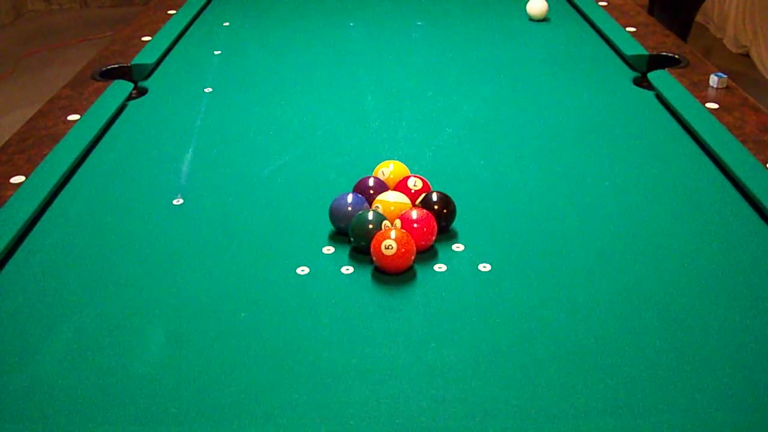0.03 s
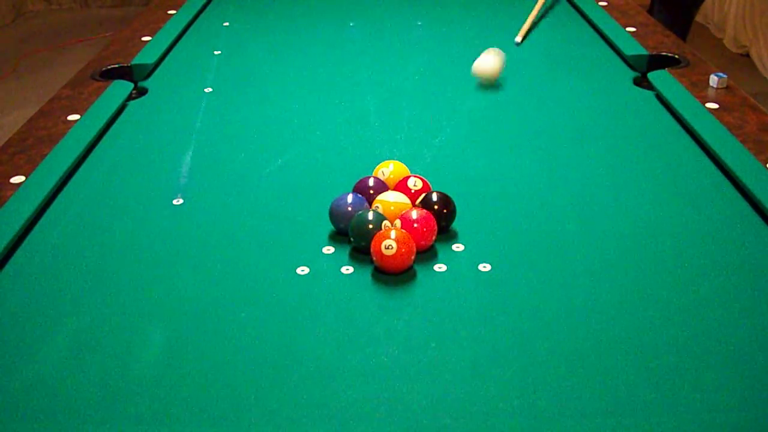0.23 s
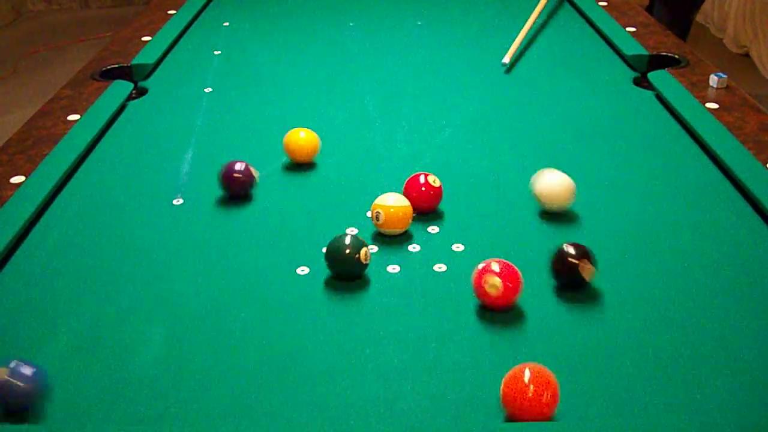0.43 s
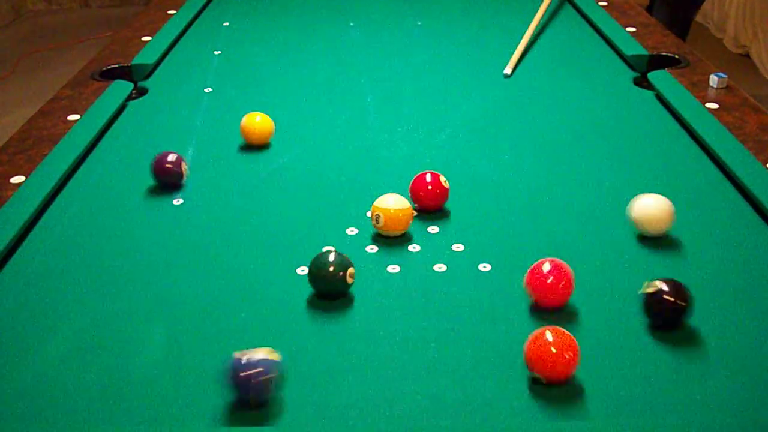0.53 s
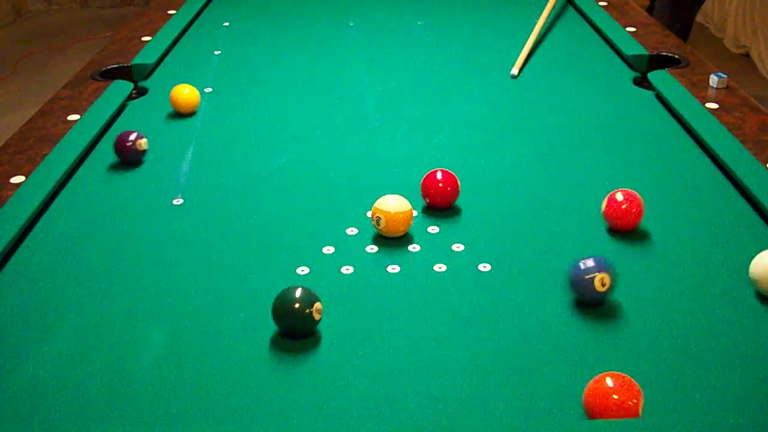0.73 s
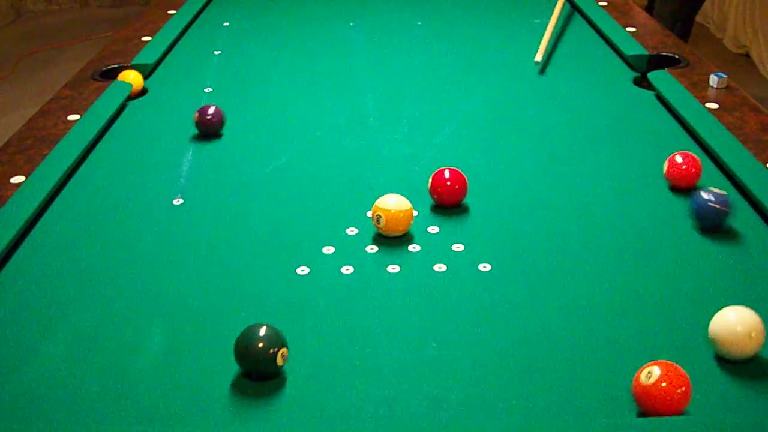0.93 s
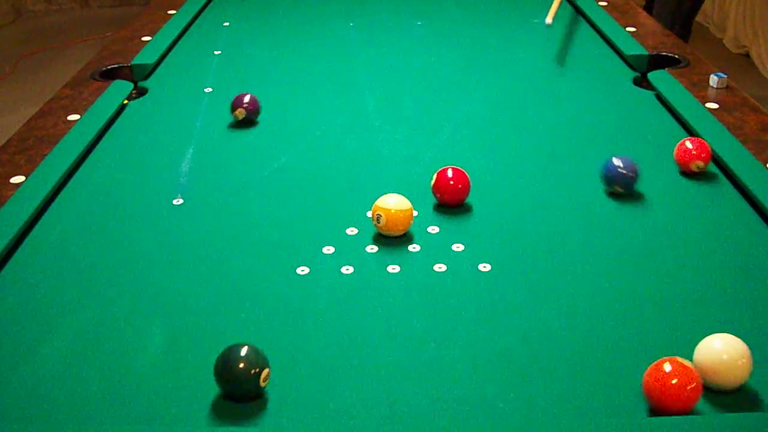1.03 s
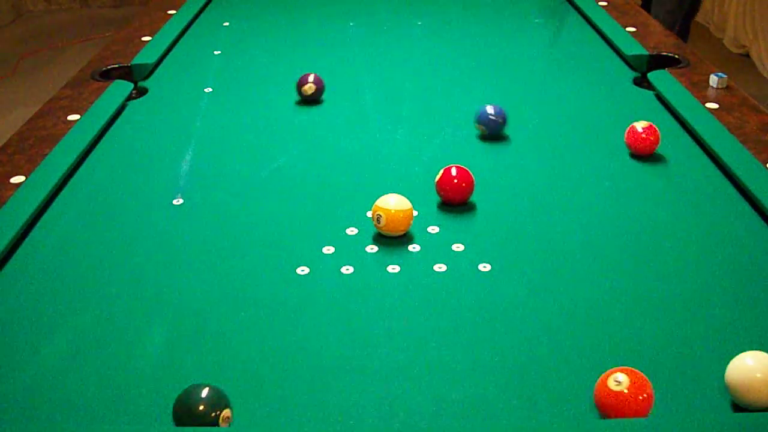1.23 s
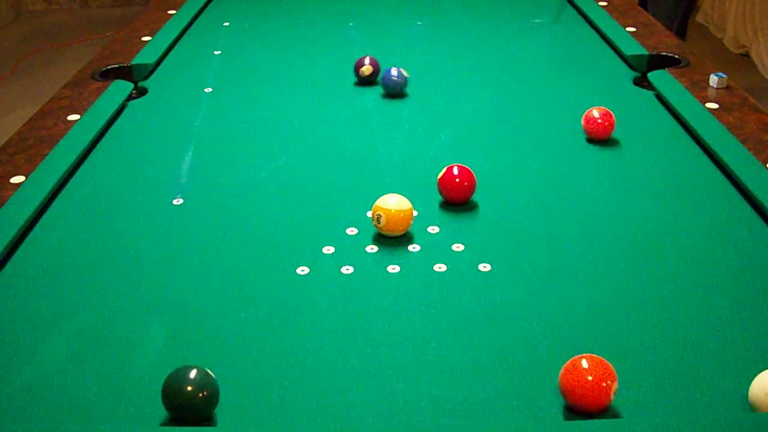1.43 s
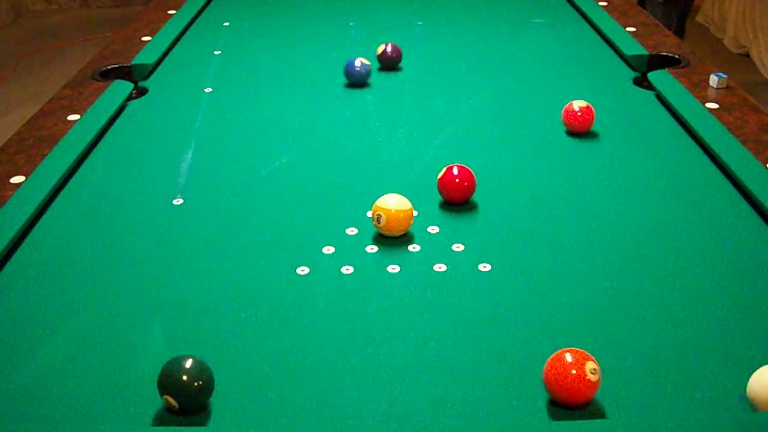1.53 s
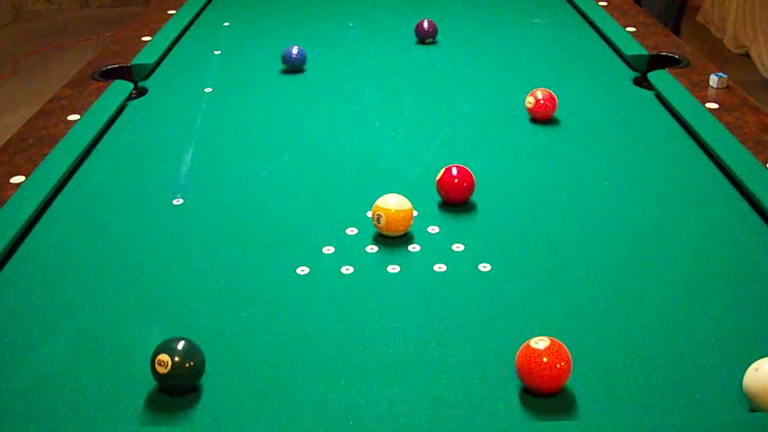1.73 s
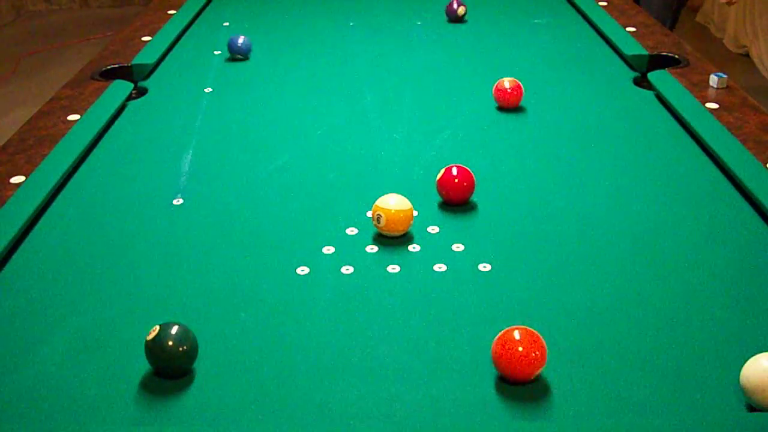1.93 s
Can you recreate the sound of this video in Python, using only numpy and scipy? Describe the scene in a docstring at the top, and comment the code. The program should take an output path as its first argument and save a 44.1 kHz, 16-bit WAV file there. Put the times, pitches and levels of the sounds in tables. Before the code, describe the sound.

A pool break, heard close in a reverberant room. A cue tocks with a faint ring at 0.25 seconds, then the ball cracks into the rack at 0.4, briefly overloading the microphone. Dull cushion thuds follow over soft rolling, with single clacks near 0.6, 1.1 and 1.5 seconds. At 0.9 a ball drops into a pocket, knocking and rumbling down the wooden return, fading toward 2 seconds.

```python
"""A cue tocks and rings, then the cue ball cracks into the rack: a pool break in a live room. Heard from just
above the foot of the table, hard balls clack, roll on cloth and thud on rubber cushions. One drops into a
pocket and rattles down the wooden ball return, ringing its hollow wood. The loudest hits duck the gain and
overload the microphone."""
import sys
import numpy as np
from scipy import signal
from scipy.fft import rfft, irfft
from scipy.io import wavfile

SR = 44100
rng = np.random.default_rng(int(sys.argv[2]) if len(sys.argv) > 2 else 0)


def master_out(mix):
    """Clip the mix to full scale and print it as 16-bit PCM to the path in sys.argv[1]."""
    frames = np.transpose(np.atleast_2d(mix))
    ceiling = np.clip(frames, -1, 1)
    pcm = np.round(ceiling * 32767).astype(np.int16)
    wavfile.write(sys.argv[1], SR, pcm)


N = 88200

# modes of the hollow wooden ball return: (frequency [Hz], level [dB], t60 [s])
WOOD_MODES = [(102.6, -3, .35), (172.4, 0.5, 0.41), (233.5, -2.5, .38), (293.5, -2, 0.24), (334, -5.5, .2),
              (382.6, -8.5, 0.19), (509.8, -1, 0.2), (563, -4.5, 0.16), (817, -13, 0.18)]


def ball_clacks():
    """Ball on ball: a few pressure swings, pitched by the contact time, with a sharp edge."""
    # collisions: (time [s], level [dB], pitch [ratio], room send [dB])
    collisions = [(0.366, 6.5, 0.587, -1.5), (0.3665, 12.5, 1.014, -1.5), (0.3669, 8, 1.394, -2.5),
                  (0.3768, -1, 1.44, 3), (0.385, 4, 1.05, 1), (0.3935, -5, 1.2, 6.5),
                  (.3958, -2.5, 0.89, 3.5), (0.5672, 7.5, 1.09, -16.5), (1.0175, -16, 0.88, 8.5),
                  (1.0872, -4, 0.92, -3), (1.5414, 2, 0.95, -11.5)]
    # edge spectrum at pitch 1: (frequency [Hz], level [dB])
    edge_spectrum = [(80, -13), (300, -4), (600, -1.5), (1200, -6.5), (2000, 5.5), (2900, -8), (3600, -12),
                     (4500, -12), (5600, -18.5), (8000, -19)]
    base_hz, edge_db, edge_lag_s = 2230, -9, 0.00045
    out = np.zeros(N)
    for start_s, db, pitch, room_db in collisions:
        contact = swing(base_hz * pitch, cycles=0.93)
        edge = amp(edge_db) * at(edge_lag_s, impulse(edge_spectrum, pitch))
        out += at(start_s, in_room(amp(db) * (contact + edge), room_db))
    return out


def bed_jolt():
    """The bursting rack thumps the table bed, heard mostly through the room."""
    start_s = 0.3675
    return at(start_s, in_room(amp(-6) * thump(hz=534, cycles=0.48), room_db=5.5))


def cue_strike():
    """The tip tocks on the cue ball with a low shove; the shaft cracks and rings."""
    # shaft crack at pitch 1: (frequency [Hz], level [dB])
    crack_spectrum = [(60, 0.5), (250, 7.5), (550, 14), (850, 17), (1200, 2.5), (1650, 12.5), (2000, 3.5),
                      (3600, 3), (5200, 1), (7000, 4.5), (8500, -2.5)]
    # shaft modes: (frequency [Hz], level [dB], t60 [s])
    shaft_modes = [(2899, 1, 0.42), (2966, -6, 0.57), (4410, -1.5, 0.15), (4497, -2, 0.25),
                   (4542, -1, 0.17), (5740, -6.5, 0.16), (6840, -12, 0.31)]
    start_s, shove_lag_s, shaft_lag_s = 0.2427, 0.0013, 0.0012
    tock = amp(1.5) * swing(hz=815, cycles=1.13)
    shove = at(shove_lag_s, amp(-4.5) * thump(hz=297, cycles=0.21))
    crack = amp(-14) * impulse(crack_spectrum, pitch=0.92)
    ringing = amp(-26.5) * ring(shaft_modes)
    tip = in_room(tock + shove, room_db=-15)
    shaft = in_room(crack, room_db=25.5) + in_room(ringing, room_db=3.5)
    return at(start_s, tip) + at(start_s + shaft_lag_s, shaft)


def pocket_knocks():
    """The potted ball bumps down the return: each contact thumps, ticks and rings the wood."""
    # contacts: (time [s], thump [dB], thump pitch [Hz], thump rise [cycles], tick [dB], room send [dB])
    contacts = [(0.9026, -21.5, 796, 0.91, -22, -4), (.9178, -15, 510, 0.31, -22.5, 1.5),
                (0.9377, -1, 361, 0.48, -15.5, -9), (1.0176, -12, 882, 0.85, -28.5, 2.5),
                (1.0612, -12, 456, 0.81, -23, -0.5), (1.0797, -6.5, 575, 0.49, -18, -11),
                (1.083, -22, 449, 0.72, -18, -5.5), (1.1395, -22, 390, .4, -34.5, -9),
                (1.186, -21.5, 497, 0.74, -32.5, 2), (1.2742, -9, 694, 0.65, -22.5, 2),
                (1.2779, -8, 573, 1.3, -18.5, -9.5), (1.3075, -5.5, 962, 0.82, -36.5, -3.5),
                (1.3520, -14, 800, 0.4, -29, -2), (1.356, -11.5, 570, 0.68, -24, -3.5),
                (1.448, -13.5, 877, 1.4, -26, -6), (1.452, -14.5, 573, 0.73, -27.5, -4.5),
                (1.5127, -19, 1120, 1.3, -26, -4), (1.5649, -14, 445, 0.33, -29, -2),
                (1.6040, -14.5, 220, .7, -39, -20), (1.6170, -19, 447, 0.75, -24.5, -5.5),
                (1.6560, -20, 502, .5, -33, -2), (1.691, -21.5, 660, 0.37, -36.5, -5),
                (1.7274, -23, 257, .6, -45, 0), (1.7545, -22.5, 734, .7, -50, -4),
                (1.9925, -13, 370, .5, -33.5, 0)]
    # tick spectrum: (frequency [Hz], level [dB])
    tick_spectrum = [(500, -5.5), (1200, 13), (2700, 6), (3800, 2.5), (5200, 2), (7200, -3), (8500, -12)]
    out = np.zeros(N)
    for start_s, db, hz, cycles, tick_db, room_db in contacts:
        body = amp(db) * (thump(hz, cycles) + amp(-27.5) * ring(WOOD_MODES))
        tick = amp(tick_db) * noise(tick_spectrum) * fade(clock(), t60_s=0.02)
        out += at(start_s, in_room(body + tick, room_db))
    return out


def cushion_thuds():
    """Rubber rails take the balls with a dull thud that sets the hollow wood of the return ringing."""
    # rail hits: (time [s], level [dB], pitch [Hz])
    rail_hits = [(.468, -18.5, 216), (.476, -11, 555), (.511, -13, 684), (.519, -9, 818),
                 (.535, -14.5, 170.8), (.590, -21.5, 350)]
    out = np.zeros(N)
    for start_s, db, hz in rail_hits:
        thud = thump(hz, cycles=0.48) + amp(-20.5) * ring(WOOD_MODES)
        out += at(start_s, in_room(amp(db) * thud, room_db=1.5))
    return out


def rolling():
    """Rolling balls murmur on the cloth; one rumbles through the hollow wood of the return."""
    # roll on cloth: (time [s], level [dB])
    cloth_levels = [(.23, -87), (.26, -34), (.44, -29.5), (.51, -29.5), (.65, -31.5), (.85, -34.5),
                    (1.3, -36), (2, -38.5)]
    # cloth murmur: (frequency [Hz], level [dB])
    cloth_spectrum = [(25, 0), (60, 5), (100, 3.5), (190, -2), (300, -11), (600, -15.5), (1500, -55),
                      (5000, -52.5)]
    # roll down the return: (time [s], rumble [dB], wood ringing [dB])
    return_levels = [(.90, -94.5, -97), (.95, -28.5, -37), (1.03, -22.5, -32), (1.10, -26.5, -18.5),
                     (1.17, -24.5, -30.5), (1.25, -34.5, -30.5), (1.30, -20, -28), (1.42, -26.5, -21.5),
                     (1.52, -26, -25), (1.61, -25.5, -22), (1.72, -27, -28.5), (1.81, -33.5, -33.5),
                     (1.89, -43, -54), (2, -76, -42)]
    # return rumble: (frequency [Hz], level [dB])
    rumble_spectrum = [(40, -7), (100, 1.5), (200, 3), (350, -4), (600, -5), (1000, -19.5), (2000, -26.5),
                       (4000, -52.5), (8000, -67)]
    wood = unit(signal.fftconvolve(rng.standard_normal(N), ring(WOOD_MODES))[:N])
    murmur = envelope(cloth_levels) * noise(cloth_spectrum)
    rumble = envelope(return_levels) * noise(rumble_spectrum)
    return murmur + rumble + envelope(return_levels, column=2) * wood


def in_room(x, room_db):
    """x plus reverberation: strong early reflections, then a long tail."""
    # room decay: (frequency [Hz], t60 [s])
    decay_times = [(100, 0.35), (400, .7), (1000, .85), (2500, 1.084), (4500, 1.027), (7500, 0.51)]
    build_s, early_db, early_s = 0.0017, 4.5, 0.088
    hz, frame_s, bands = signal.stft(rng.standard_normal(N), SR, nperseg=256)
    bands = bands * fade(frame_s, along(decay_times, hz)[:, None])
    tail = signal.istft(bands, SR, nperseg=256)[1][:N]
    tail *= 1 - np.exp(-clock() / build_s)
    tail *= amp(early_db * np.exp(-clock() / early_s))
    return x + amp(room_db) * signal.fftconvolve(x, tail / np.linalg.norm(tail))[:N]


def room_tone():
    """Faint, steady, mostly low noise."""
    # noise floor: (frequency [Hz], level [dB])
    floor_spectrum = [(15, -8.5), (45, -0.5), (90, -6), (130, -15), (220, -21.5), (600, -21.5),
                      (1100, -31.5), (7000, -35.5), (9000, -46)]
    return amp(-54) * noise(floor_spectrum)


def swing(hz, cycles):
    """Hard contact: a short sine burst whose envelope peaks after `cycles`."""
    periods = clock() * hz
    rise = (periods / cycles) ** 2
    return np.sin(2 * np.pi * periods) * rise * np.exp(1 - rise)


def thump(hz, cycles):
    """Soft contact: a sine burst whose envelope peaks after `cycles` and falls more gently."""
    periods = clock() * hz
    rise = periods / cycles
    return -np.sin(2 * np.pi * periods) * (rise * np.exp(1 - rise)) ** 2


def ring(modes):
    """Decaying modes; levels and phases vary per strike."""
    t = clock()[:N // 2]
    out = np.zeros(N)
    for hz, db, t60_s in modes:
        gain = amp(db + 2 * rng.normal())
        out[:len(t)] += gain * fade(t, t60_s) * np.sin(2 * np.pi * (hz * t + rng.random()))
    return out


def impulse(spectrum, pitch):
    """Minimum-phase click, peak 1; `pitch` scales the spectrum's frequencies."""
    magnitude = amp(along(spectrum, np.fft.rfftfreq(N, 1 / SR) / pitch))
    cepstrum = irfft(np.log(magnitude))
    causal = 2 * cepstrum[:N // 2] * (np.arange(N // 2) > 0)
    click = irfft(np.exp(rfft(causal, N)))
    return click / np.abs(click).max()


def noise(spectrum):
    """Coloured noise, rms 1."""
    return unit(filtered(rng.standard_normal(N), lambda hz: amp(along(spectrum, hz))))


def filtered(x, response):
    """x through a zero-phase gain response(hz)."""
    return irfft(rfft(x, 2 * N) * response(np.fft.rfftfreq(2 * N, 1 / SR)))[:N]


def along(points, hz):
    """Interpolate (frequency [Hz], value) rows on a log axis."""
    point_hz, values = np.transpose(points)
    return np.interp(np.log(hz + 1), np.log(point_hz + 1), values)


def envelope(points, column=1):
    """Gain per sample from (time [s], level [dB], ...) rows."""
    columns = np.transpose(points)
    return amp(np.interp(clock(), columns[0], columns[column]))


def fade(t, t60_s):
    """Exponential decay."""
    return np.exp(-np.log(1000) * t / t60_s)


def at(start_s, x):
    """x delayed by start_s."""
    return np.pad(x, (round(start_s * SR), 0))[:N]


def amp(db):
    """dB to gain."""
    return 10 ** (np.asarray(db) / 20)


def unit(x):
    """x at rms 1."""
    return x / np.sqrt(np.mean(x ** 2) + 1e-20)


def clock():
    """Sample times [s]."""
    return np.arange(N) / SR


def gain_control(x):
    """Ducks fast above the threshold, recovers slowly."""
    threshold_db, slope, attack_s, recovery_db_per_s = -8.5, 0.65, 0.0051, 14
    pole = np.exp(-1 / (attack_s * SR))
    smooth = lambda v: signal.lfilter([1 - pole], [1, -pole], v)
    power_db = 10 * np.log10(smooth(x ** 2) + 1e-12)
    duck_db = slope * np.maximum(power_db - threshold_db, 0)
    recovery_db = recovery_db_per_s * clock()
    held_db = np.maximum.accumulate(duck_db + recovery_db) - recovery_db
    return x * amp(-smooth(held_db))


def mic_overload():
    """Offset timed to the break: the microphone is pushed off centre, sags, undershoots, recovers."""
    start_s, rise_s, sag_s, recover_s, undershoot = 0.3672, 0.00084, 0.019, 0.075, 0.29
    t = clock()
    offset = np.exp(-t / sag_s) - undershoot * np.exp(-t / recover_s)
    onset = 1 - np.exp(-t / rise_s)
    return at(start_s, amp(-2.5) * offset * onset)


def scene():
    """All table sounds over the room tone, mono."""
    impacts = cue_strike() + ball_clacks() + bed_jolt() + cushion_thuds() + pocket_knocks()
    return (impacts + rolling() + room_tone())[None]


def record(dry):
    """Dull microphone, gain control, overload and soft clipping; a shelf tames the clipping splash."""
    mic_hz, clip_db = 8260, -2.5
    shelf_hz, shelf_db, ramp_hz, top_hz = 8460, -11, 500, 16300
    x = signal.sosfilt(signal.butter(N=14, Wn=mic_hz, fs=SR, output="sos"), dry[0])
    x = gain_control(x) + mic_overload()
    clipped = x / (1 + (x / amp(clip_db)) ** 10) ** (1 / 10)
    shelf = lambda hz: amp(shelf_db * np.clip((hz - shelf_hz) / ramp_hz + 1, 0, 1))
    return filtered(clipped, lambda hz: shelf(hz) * (hz < top_hz))[None]


dry = scene()
out = record(dry)
master_out(out)
```